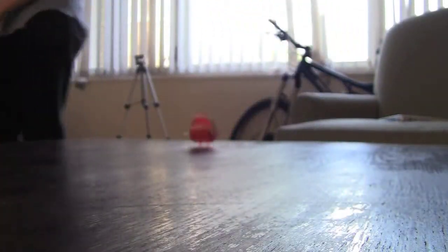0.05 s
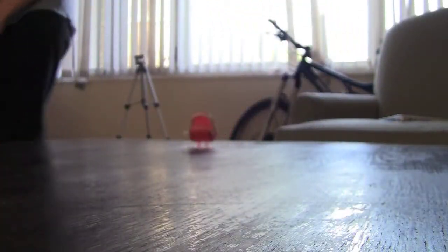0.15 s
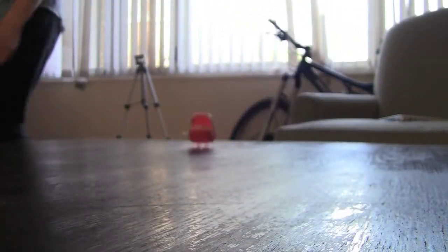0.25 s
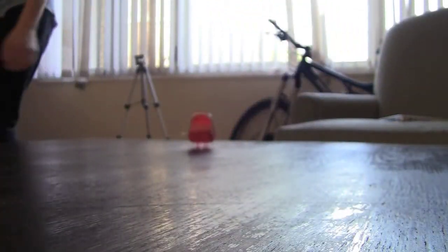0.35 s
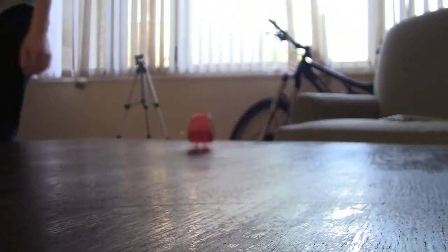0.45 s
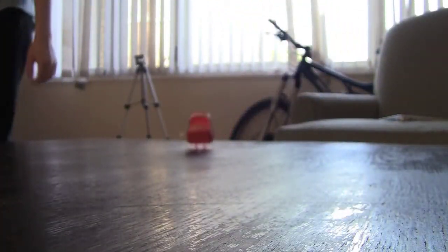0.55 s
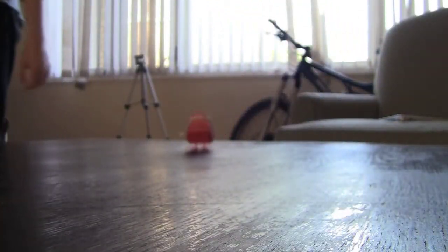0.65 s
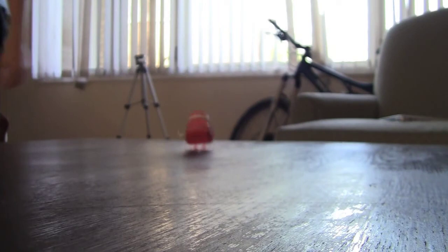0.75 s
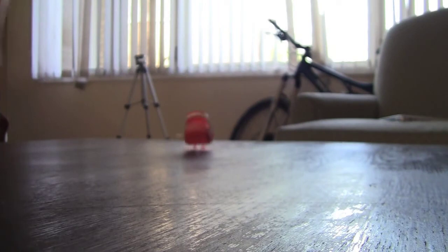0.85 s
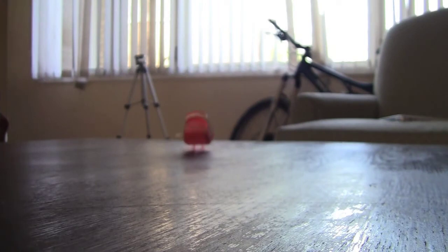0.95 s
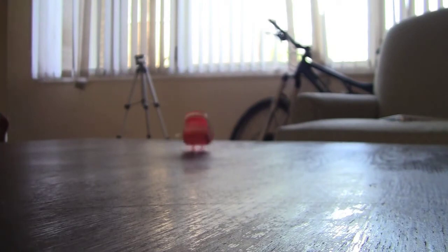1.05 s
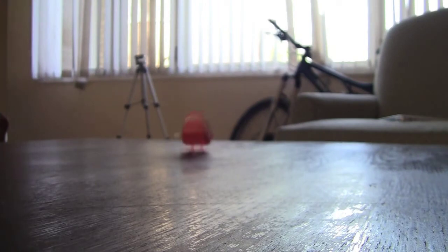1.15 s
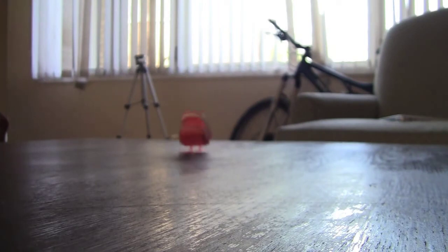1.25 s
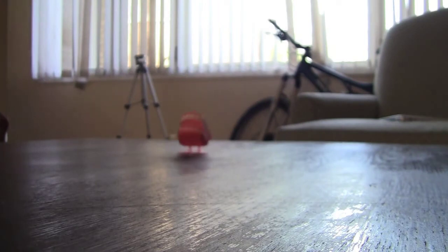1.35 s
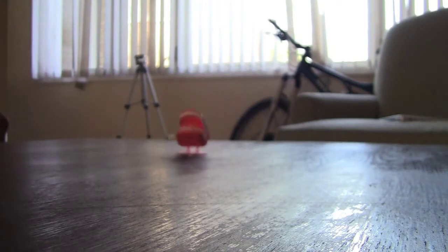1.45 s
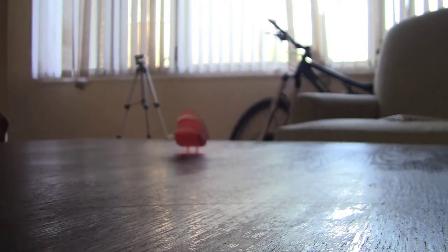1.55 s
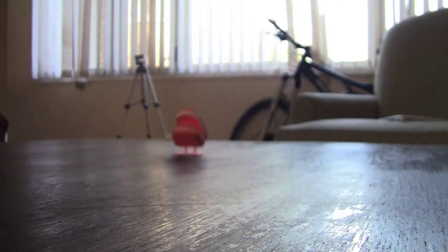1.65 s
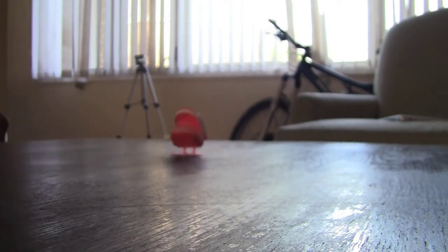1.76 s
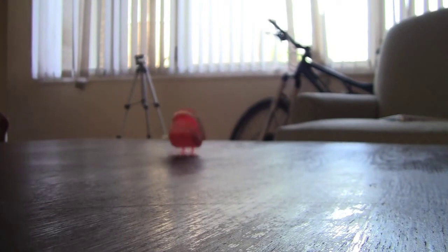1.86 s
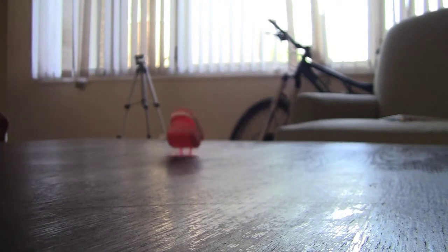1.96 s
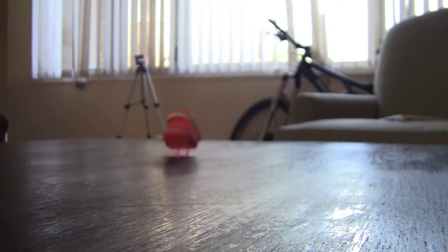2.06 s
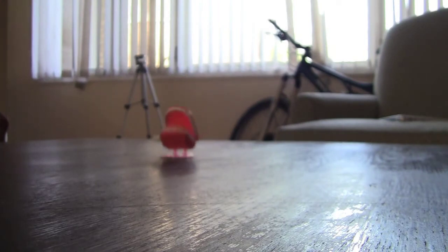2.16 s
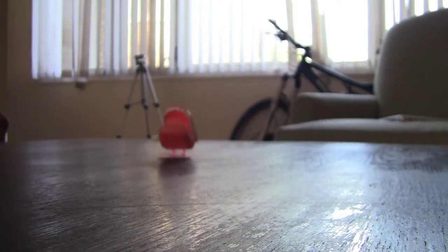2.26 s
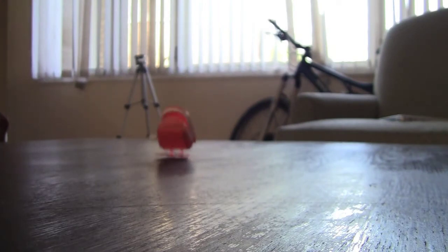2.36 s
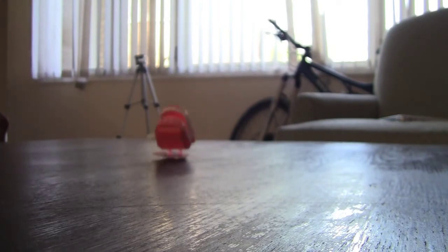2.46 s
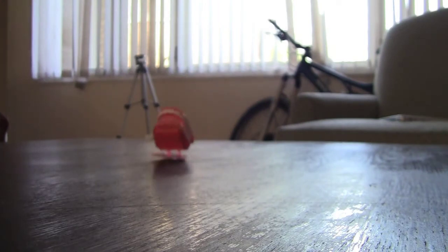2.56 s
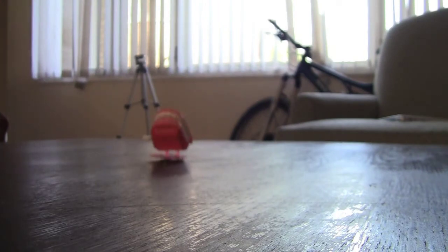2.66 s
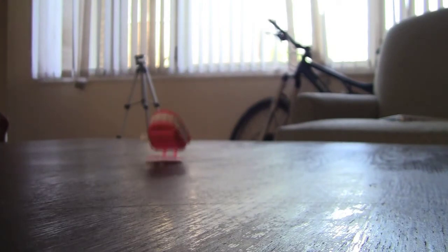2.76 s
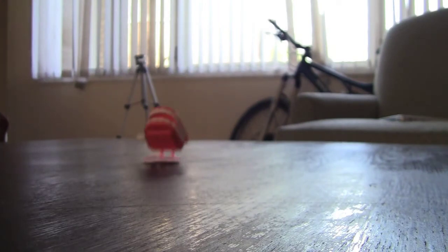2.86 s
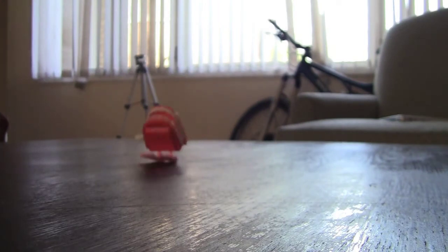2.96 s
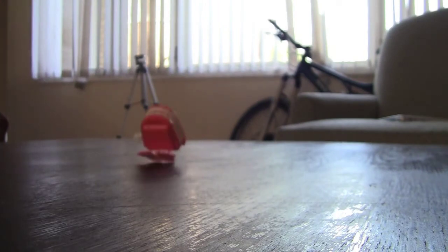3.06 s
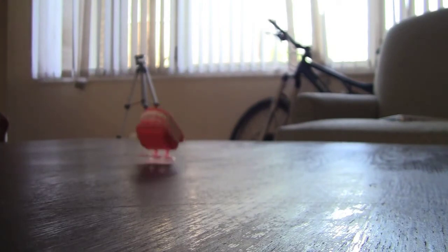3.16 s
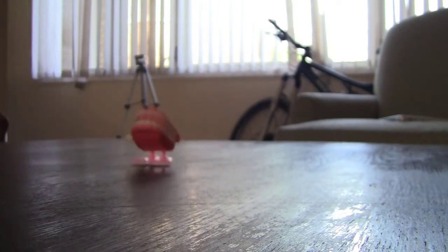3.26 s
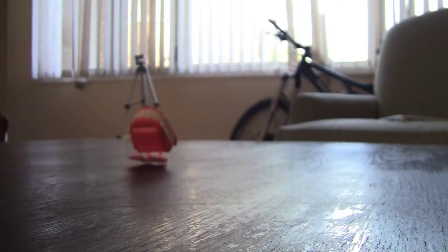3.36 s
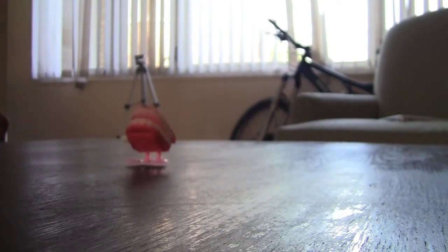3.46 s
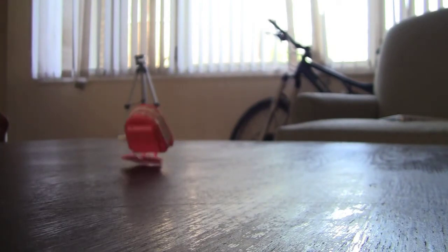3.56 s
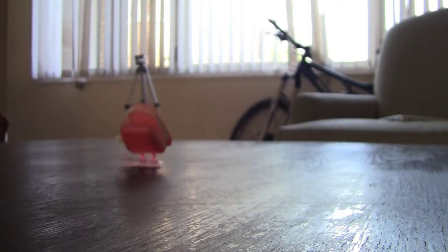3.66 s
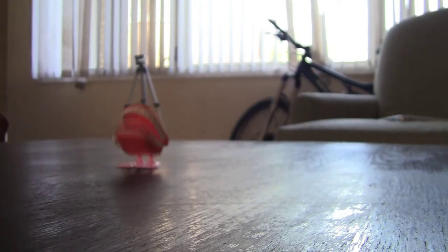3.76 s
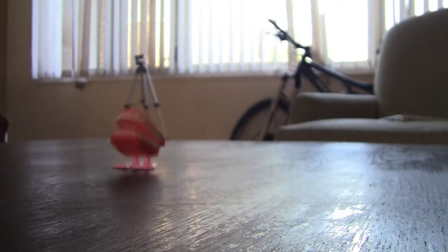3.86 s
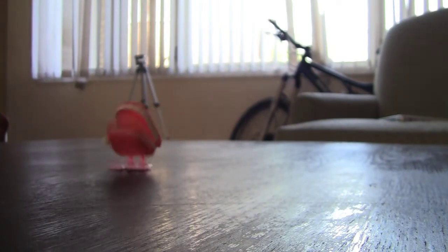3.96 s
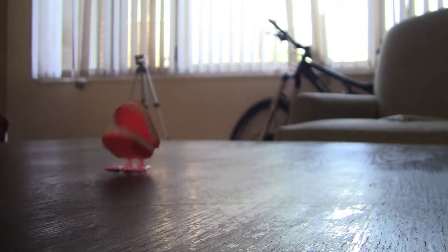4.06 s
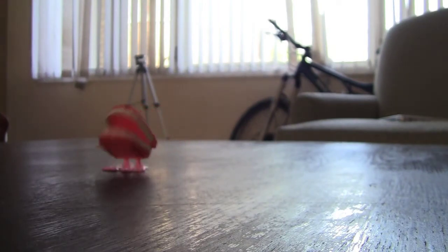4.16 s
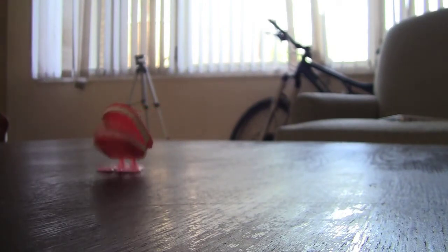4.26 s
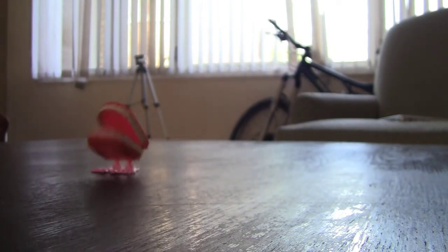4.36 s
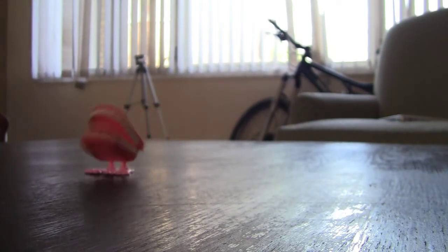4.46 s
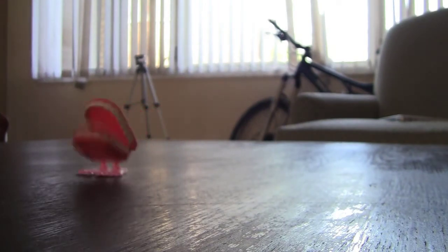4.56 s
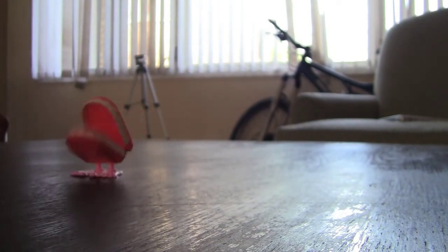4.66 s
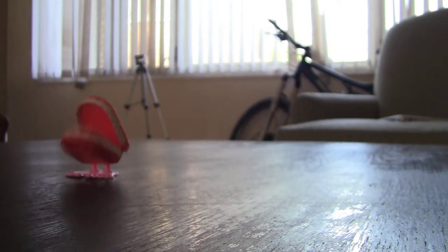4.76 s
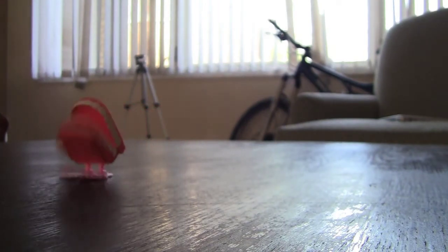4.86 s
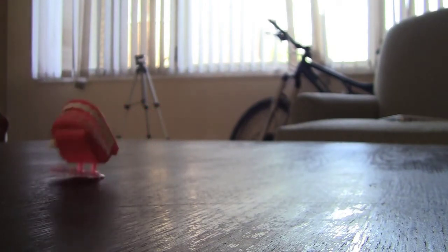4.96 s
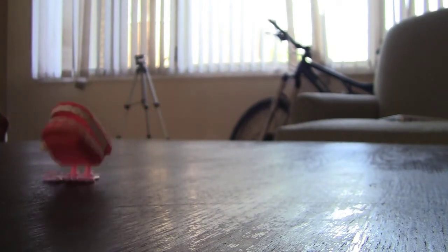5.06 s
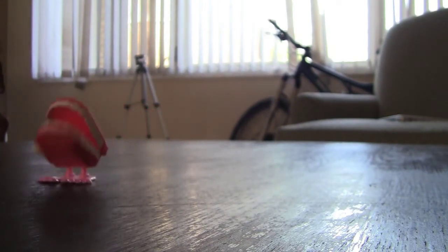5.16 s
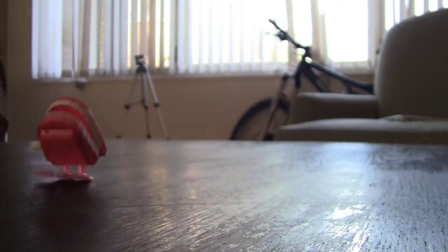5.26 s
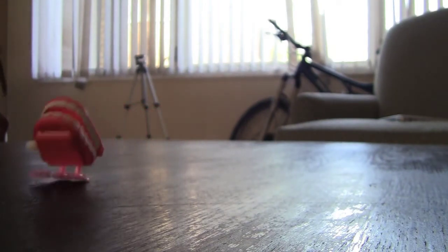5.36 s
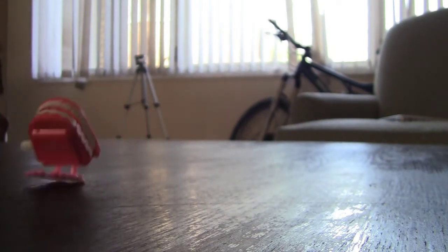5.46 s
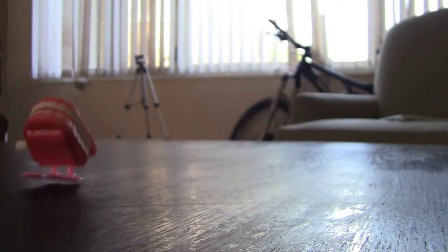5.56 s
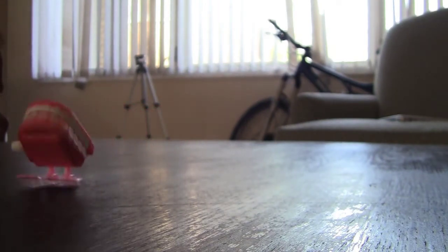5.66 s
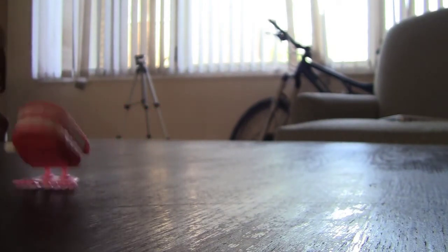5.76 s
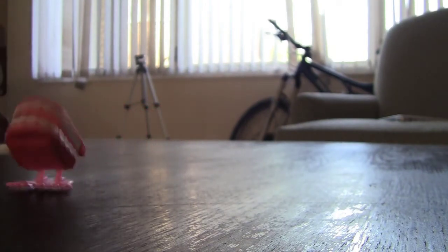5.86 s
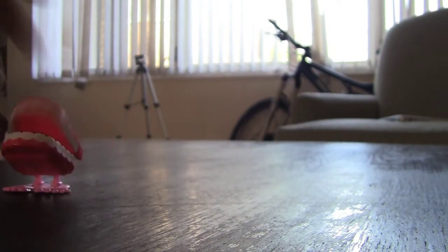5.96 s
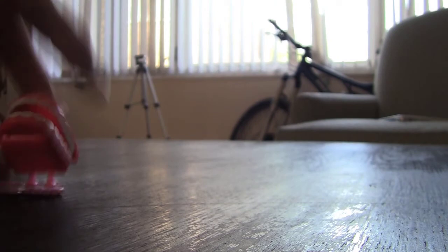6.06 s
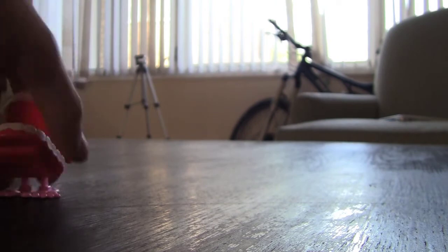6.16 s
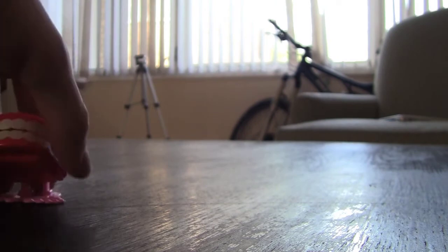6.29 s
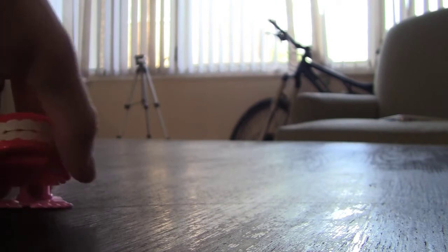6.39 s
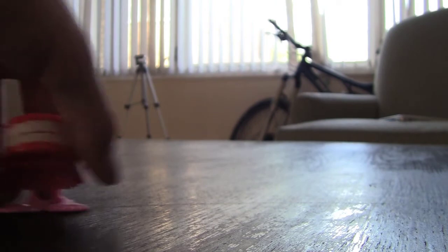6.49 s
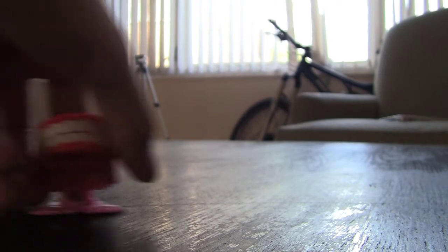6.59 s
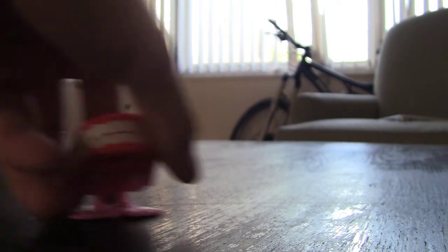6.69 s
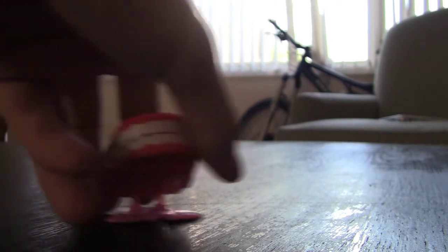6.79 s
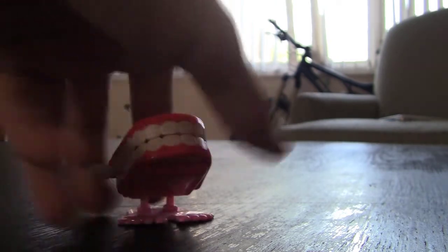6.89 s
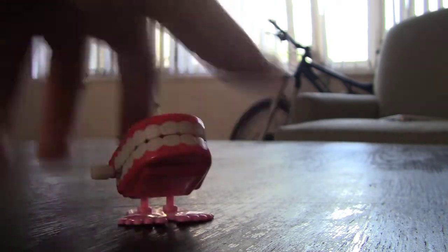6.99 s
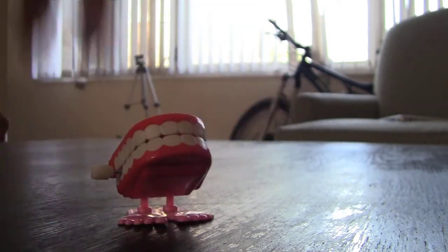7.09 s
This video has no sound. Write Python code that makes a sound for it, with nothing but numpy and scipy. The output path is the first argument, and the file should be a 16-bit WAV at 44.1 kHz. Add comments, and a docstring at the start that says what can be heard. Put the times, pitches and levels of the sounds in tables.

```python
"""Wind-up teeth on a wooden table

Place: a quiet furnished room with faint hum; the toy is nearly straight ahead of two close-set microphone ports.
About ten times a second the linkage knocks, the cam ticks and the jaws clack in either order, the feet land.
Gear teeth rattle in the case and drone in the wood until the spring runs down. A hand bumps the table, grabs
the toy, slides it, lets go. Blows and rubbing ring resonances; the air is coloured noise, spring and hum are
sine tones. The room adds reflections; the microphone dulls the treble, and a limiter ducks the loud clacks."""
import sys
import numpy as np
from scipy import signal
from scipy.fft import rfft, irfft
from scipy.io import wavfile

SR = 44100
rng = np.random.default_rng(int(sys.argv[2]) if len(sys.argv) > 2 else 0)


def pcm_store(signal):
    """Save signal as 16-bit PCM."""
    levels = np.round(np.clip(np.atleast_2d(signal), -1, 1) * 32767)
    wavfile.write(sys.argv[1], SR, levels.astype(np.int16).T)


N = 314433
TIME = np.arange(N) / SR
BINS = np.fft.rfftfreq(4096, 1 / SR)  # frequency grid of the resonant bodies [Hz]

# Levels in the tables are relative: each source trims its own. Resonances are nominal: blows may detune them.
# colour of the quiet room's air: (frequency [Hz], relative density [dB per Hz])
AIR = [(25, -19), (243, -4.5), (900, -18), (2400, -13), (10000, -27), (14000, -84)]
# running gears: (time [s], whirr in the air [dB], drone in the table [dB])
MOTOR = [(0, -34.5, -42), (.8, -40, -46.5), (1.6, -41.5, -48.5), (3.2, -43, -48), (6.0, -49, -56)]
# resonances of gear case and table top: (frequency [Hz], width [Hz], level [dB])
GEARS = [(2327, 53, 2), (2610, 710, -9.5), (3700, 73, -10), (4440, 860, -11.5), (6720, 670, -11),
         (9550, 140, -8)]
TABLE = [(102, 13, -11), (129, 7.8, -3.5), (166, 17, -2), (223, 14, -1), (328.3, 14, 2), (355, 34, -1.5),
         (404, 94, -1), (543, 33, -1), (774, 115, -1.5), (1041, 17.6, 4), (1130, 12.4, 0.5), (1374, 81, -5),
         (1630, 550, -9.5)]
# how gears and landing soles drive the table: (frequency [Hz], level [dB])
DRONE = [(100, -4.5), (400, -3), (1500, -7), (5000, -25)]
# one turn of the cam, one hop:
# (linkage knock [s], delay until jaws shut [s], knock [dB], clack [dB], spring ring [dB])
HOPS = [(0.0205, 0.018, -20, -13.5, -35), (0.101, 0.027, -28.5, -24.5, -44),
        (0.1965, 0.0432, -18, -14, -31), (0.301, 0.034, -26, -23.5, -35),
        (0.4148, 0.029, -16.5, -18, -34.0), (0.5205, 0.034, -20.0, -18.5, -31),
        (0.6278, 0.0217, -21, -20.5, -29), (0.7179, 0.0281, -22, -20.5, -28),
        (0.824, 0.016, -19, -15.5, -34), (0.928, 0.015, -23.5, -21.5, -48.0), (1.0305, 0.02, -25, -21, -41),
        (1.1241, 0.023, -23, -20, -35), (1.2201, 0.027, -21.5, -19, -35), (1.3245, 0.014, -19, -20, -53),
        (1.4235, 0.021, -22.5, -21.5, -39), (1.5206, 0.015, -22.5, -25.5, -51),
        (1.6179, 0.0246, -22.5, -20.5, -36), (1.7194, 0.018, -20.5, -17.0, -34),
        (1.8069, 0.027, -27, -22, -34), (1.9215, 0.0306, -19.5, -19.5, -47),
        (2.027, 0.028, -19.5, -21, -51), (2.1264, 0.0251, -21.0, -22.5, -29),
        (2.2211, 0.0212, -20.0, -16, -35), (2.31, 0.0425, -28, -19, -53), (2.433, 0.036, -21.5, -19, -40),
        (2.5425, 0.036, -20.0, -21, -32), (2.6483, 0.03, -21, -16, -53), (2.7445, 0.024, -27.5, -23.5, -48),
        (2.8477, 0.014, -24, -15.5, -32), (2.9508, 0.0082, -23, -22, -34),
        (3.0553, 0.03, -20.0, -18.0, -33), (3.1593, 0.039, -18.5, -17, -39), (3.2831, 0.026, -20, -17, -41),
        (3.3844, 0.0189, -22.0, -17, -50), (3.4728, 0.027, -26, -21.5, -50), (3.5793, 0.018, -22, -16, -41),
        (3.6688, 0.036, -26, -21.5, -37), (3.788, 0.034, -22, -16, -42), (3.8999, 0.029, -24.0, -21.5, -40),
        (4.0078, 0.018, -21.5, -14, -49.5), (4.0957, 0.036, -27, -23, -39), (4.217, 0.026, -21.0, -19, -41),
        (4.314, 0.023, -22.5, -18, -37), (4.4067, 0.029, -24.5, -23, -28), (4.5121, 0.029, -20, -19.5, -32),
        (4.6235, 0.019, -21, -16.0, -46), (4.7075, 0.037, -29.5, -22, -40),
        (4.8204, 0.029, -20, -18, -30.5), (4.9214, 0.039, -23, -15, -27), (5.039, 0.035, -19, -16, -42),
        (5.1552, 0.02, -23.0, -15.5, -44.0), (5.251, 0.019, -29, -17, -36),
        (5.3454, 0.029, -25.5, -24.5, -40), (5.4584, 0.031, -19.5, -18.5, -30.5),
        (5.5636, 0.038, -22.5, -17.5, -39), (5.6769, 0.033, -21, -20, -41),
        (5.7851, 0.026, -22.0, -18, -36), (5.8898, 0.014, -18.5, -13, -37), (5.986, 0.015, -24, -16.5, -31)]
# after each knock the cam slips and throws the toy up; it lands after a short flight
TAKEOFF_S, FLIGHT_S = 0.0192, 0.042
# resonances of linkage, cam, hollow jaws and teeth: (frequency [Hz], width [Hz], level [dB])
LINKAGE = [(2500, 590, -3), (2730, 260, -3), (3946, 143, 3), (5500, 820, -5), (6790, 170, 2),
           (6980, 180, -3), (8540, 770, -9.5), (9650, 420, -14.5), (9400, 530, -6.5), (10610, 490, 0)]
CAM = [(2320, 460, 2.7), (3800, 550, 3.1), (6600, 2900, 0.6), (8200, 590, 5.4), (9300, 3300, 2.7)]
JAWS = [(2360, 230, -3.5), (2620, 950, -6), (3000, 850, -6.5), (4400, 260, -6), (5150, 600, -10.5)]
TEETH = [(6637, 246, 0), (8280, 340, -3), (8850, 360, 1), (9560, 136, 5), (10220, 234, 2.5)]
# how a hard knock drives the table: (frequency [Hz], level [dB])
HARD = [(100, -6.5), (500, -15), (800, -4.5), (1700, -2), (3000, -9.5)]
# table top under the wandering toy: (time [s], how readily it sounds [dB], note favoured there [Hz])
SPOT = [(0, -4.5, 1560), (0.7, 1, 1200), (1.4, -2, 900), (2.3, -2, 795), (3.5, -10, 1030),
        (4.6, -7.5, 1070), (6.0, -7, 1080)]
# the steel spring, one row: (frequency [Hz], level [dB], 60 dB decay [s])
SPRING = (2353, 4.1, 0.18)
# how toes and foot edges drive the table: (frequency [Hz], level [dB])
SCUFF = [(400, -4), (1000, -0.5), (1400, 11.5), (2200, -13)]
# a foot comes down on its edge: (time [s], plastic [dB], table [dB])
STUMBLES = [(0.164, -19, -36), (0.17, -22.5, -37), (0.1888, -17.5, -26), (0.194, -18.5, -17),
            (1.398, -25, -34), (2.191, -28, -37), (3.022, -22.5, -30)]
# the toy clicks in the hand and is set down: (time [s], body [dB], sharp edge [dB])
HANDLING = [(6.1462, -37, -15), (6.157, -25, -18), (6.176, -34, -21), (6.214, -35, -16),
            (6.237, -22.5, -49), (6.294, -30, -33), (6.3812, -17, -11.5), (6.397, -29, -48),
            (6.678, -38.5, -63), (6.713, -41, -68), (7.007, -19, -17), (7.012, -18, -27)]
# resonances of the held toy's soles and legs: (frequency [Hz], width [Hz], level [dB])
SOLES = [(2350, 490, 4.5), (2780, 290, 4), (4240, 860, -3), (6860, 2000, -13), (9350, 2100, -10)]
# how a blunt and a sharp contact drive the soles: (frequency [Hz], level [dB])
BLUNT = [(600, -1), (1500, 1), (3000, 3), (4000, 0), (8000, -6.5)]
SHARP = [(3000, -13), (6000, -0.5), (10500, 3), (12500, -15)]
# the hand bumps the table: (time [s], level [dB], decay [s])
BUMPS = [(6.214, -22.5, 0.031), (6.236, -33, 0.022), (6.274, -37, 0.031)]
# toy and hand slide over the wood: (time [s], rumble [dB], hiss [dB])
SLIDE = [(6.3, -36, -52), (6.42, -46.5, -51), (6.6, -37.5, -56), (6.75, -41, -53), (6.85, -39.5, -48.5),
         (6.95, -45, -54), (7.13, -41, -74)]
# how a soft hand drives the table: (frequency [Hz], level [dB])
SOFT = [(100, 8.5), (400, 2), (700, -2.5), (1100, -6.5), (1800, -13.5), (6000, -33)]
# decay of the room's tail: (frequency [Hz], 60 dB decay [s])
ROOM = [(200, 0.63), (2500, 0.2), (6000, 0.19), (12000, 0.052)]
# a faint, short noise-like spread between left and right, strongest above 11 kHz: (frequency [Hz], level [dB])
SPREAD = [(300, -15.5), (2500, -33), (6000, -16.5), (7500, -11), (10000, -30), (11000, -5), (12300, 0),
          (16000, -8)]
MIC_HZ = 11850  # where the microphone starts to dull the treble
EDGE_HZ = 16300  # steep cut at the very top


def amp(db):
    """Decibels to gain."""
    return 10 ** (np.asarray(db) / 20)


def unit(x):
    """Scales a signal to rms 1."""
    return x / np.sqrt(np.mean(x ** 2) + 1e-20)


def read(points, hz):
    """Reads a spectrum table on a log-frequency axis."""
    f, value = np.transpose(points)
    return np.interp(np.log(hz + 1), np.log(f + 1), value)


def add(mix, s, sound):
    """Mixes a sound in at time s."""
    part = mix[max(round(s * SR), 0):][:len(sound)]
    part += sound[:len(part)]


def flutter(per_s):
    """Random wander of rms 1, its spectrum fading out around per_s [Hz]."""
    fade = np.exp(-(np.fft.rfftfreq(N, 1 / SR) / per_s) ** 2)
    return unit(irfft(rfft(rng.standard_normal(N)) * fade, N))


def body(modes, drive=((1, 0),), vary_db=0, detune=0):
    """Causal impulse response of a set of resonances; each blow can meet them a little differently."""
    hz, width, db = np.transpose(modes)[:, :, None]
    loud, shift = rng.standard_normal((2, len(modes), 1))
    hz = hz * (1 + detune * shift)
    off_tune = (BINS ** 2 - hz ** 2) / ((BINS + 1) * width)
    power = amp(db + vary_db * loud) ** 2 / (1 + off_tune ** 2)
    magnitude = np.sqrt(power.sum(0)) * amp(read(drive, BINS))
    # folding the cepstrum gives minimum phase: the energy comes as early as it can
    cepstrum = irfft(np.log(magnitude + 1e-5))
    cepstrum[1:len(BINS) - 1] *= 2
    cepstrum[len(BINS):] = 0
    return irfft(np.exp(rfft(cepstrum)))


def strike(ring, db, chatter_s, rattle):
    """One blow with a dying rattle of the contact; db is the rms level over its first 6 ms."""
    t = np.arange(len(ring)) / SR
    force = rattle * rng.standard_normal(len(t)) * np.exp(-t / chatter_s) / np.sqrt(chatter_s * SR / 2)
    force[0] += 1
    sound = signal.fftconvolve(force, ring)[:len(t)]
    onset_rms = np.sqrt(np.mean(sound[:round(.006 * SR)] ** 2))
    return amp(db) * sound / onset_rms


def rub(ring, grain_db=0, per_s=SR):
    """Endless small impacts of uneven size, about per_s a second, ring a body; rms 1."""
    size = amp(grain_db * np.minimum(rng.exponential(1, N), 4)) * rng.standard_normal(N)
    impacts = size * (rng.random(N) < per_s / SR)
    return unit(signal.oaconvolve(impacts, ring)[:N])


def swells(rows, rise_s):
    """Envelope of pushes (time [s], level [dB], decay [s]) that rise quickly and die away."""
    level, t = np.zeros(N), np.arange(SR // 2) / SR
    for s, db, decay_s in rows:
        add(level, s, amp(db) * (1 - np.exp(-t / rise_s)) * np.exp(-t / decay_s))
    return level


def table_at(s, drive, note_db=2, note_width_hz=170):
    """The ring of the table top where the toy stands at time s, and how readily it sounds there [dB]."""
    times, give_db, note_hz = np.transpose(SPOT)
    note = (np.interp(s, times, note_hz), note_width_hz, note_db)
    wood = body([*TABLE, note], drive, vary_db=3.0, detune=0.043)
    return wood, np.interp(s, times, give_db)


def background(air_db=-52, hum_db=-58, hum_hz=120, apart=0.23):
    """Still air as coloured noise, mostly shared by the two ports, and a faint mains hum as a sine."""
    colour = amp(read(AIR, np.fft.rfftfreq(N, 1 / SR)))
    shared, left, right = (unit(irfft(rfft(z) * colour, N)) for z in rng.standard_normal((3, N)))
    hum = amp(hum_db) * unit(np.sin(2 * np.pi * hum_hz * TIME))
    return amp(air_db) * (shared + apart * np.array([left, right])) + hum


def motor(whirr_db=2, drone_db=4, airborne_db=-8, unloaded_db=1.5, stop_s=6.13):
    """Gear teeth rattle in the case, a little louder in flight, when the table drone drops."""
    s, air_db, wood_db = np.transpose(MOTOR)
    running = np.clip((stop_s - TIME) / 0.14, 0, 1)
    aloft = np.zeros(N)
    for knock_s, *_ in HOPS:
        add(aloft, knock_s + TAKEOFF_S, signal.windows.tukey(round(FLIGHT_S * SR), .3))
    whirr_level = amp(np.interp(TIME, s, air_db) + whirr_db + unloaded_db * aloft)
    drone_level = amp(np.interp(TIME, s, wood_db) + drone_db + airborne_db * aloft)
    whirr = whirr_level * rub(body(GEARS), grain_db=1, per_s=1100)
    drone = drone_level * rub(body(TABLE, DRONE))
    return running * (whirr + drone) * amp(3.27 * flutter(per_s=15.6))


def linkage(plastic_db=2.5, table_db=-5, cam_db=-2):
    """The lever knocks, and the legs carry the knock into the table; then the cam ticks as it slips."""
    out = np.zeros(N)
    for s, _, db, _, _ in HOPS:
        wood, give_db = table_at(s, HARD)
        lever = body(LINKAGE, vary_db=0.0, detune=0.011)
        cam = body(CAM, vary_db=2, detune=0.0058)
        add(out, s, strike(lever, db + plastic_db, chatter_s=0.0018, rattle=0.83))
        add(out, s, strike(wood, db + give_db + table_db, chatter_s=0.0091, rattle=1.0))
        add(out, s + TAKEOFF_S, strike(cam, db + cam_db, chatter_s=0.0035, rattle=2.6))
    return out


def jaws(shell_db=2.5, teeth_db=-13.5, teeth_follow=0.48, glancing_db_per_s=55):
    """Hollow jaws give the clack its body, teeth its sharp edge; jaws that shut late meet less squarely."""
    out = np.zeros(N)
    _, usual_delay, _, usual_db, _ = np.mean(HOPS, axis=0)
    shell_drive = [(400, -8), (1500, 0), (5500, 0), (9000, -10)]  # (frequency [Hz], level [dB])
    teeth_drive = [(2000, 5.0), (6000, 1.6)]
    for s, delay, _, db, _ in HOPS:
        shell = body(JAWS, shell_drive, vary_db=1.3, detune=.015)
        teeth = body(TEETH, teeth_drive, vary_db=1, detune=0.012)
        edge_db = teeth_db + teeth_follow * (db - usual_db) - glancing_db_per_s * (delay - usual_delay)
        add(out, s + delay, strike(shell, db + shell_db, chatter_s=0.0013, rattle=1.0))
        add(out, s + delay, strike(teeth, edge_db, chatter_s=0.0019, rattle=1.0))
    return out


def spring(ring_db=3, buzz_db=3.5, detune=0.0035, jolt_db=-38, jolt_fade_db_per_s=4):
    """Clacks set the steel spring singing and buzzing on its coils; landings jolt it, less as it unwinds."""
    out, t = np.zeros(N), np.arange(SR // 4) / SR
    plucks = [(s + delay, db + ring_db) for s, delay, _, _, db in HOPS]
    plucks += [(s + TAKEOFF_S + FLIGHT_S, jolt_db - jolt_fade_db_per_s * s) for s, *_ in HOPS]
    hz, mode_db, t60 = SPRING
    for (s, db), (phase, shift) in zip(plucks, rng.standard_normal((len(plucks), 2))):
        tone = np.sin(2 * np.pi * (hz * (1 + detune * shift) * t + phase))
        add(out, s, amp(db + mode_db) * np.exp(-np.log(1000) * t / t60) * tone)
    return out * amp(buzz_db * flutter(per_s=59))


def feet(toe_db=-32, sole_db=-37, settle_s=0.014, scrape_db=-35, scuff_s=0.016,
         scatter_s=0.0027, uneven_db=0.5):
    """After each flight the toes tap the wood, the soles settle with a lower thud, and they skid briefly."""
    out, skids = np.zeros(N), []
    for (knock_s, *_), (late, hard) in zip(HOPS, rng.standard_normal((len(HOPS), 2))):
        s = knock_s + TAKEOFF_S + FLIGHT_S + scatter_s * late
        wood, give_db = table_at(s, SCUFF)
        db = give_db + uneven_db * hard
        thud = body(TABLE, DRONE, vary_db=1, detune=0.036)
        add(out, s, strike(wood, db + toe_db, chatter_s=0.0031, rattle=1.47))
        add(out, s + settle_s, strike(thud, db + sole_db, chatter_s=0.0068, rattle=2.5))
        skids.append((s, db + scrape_db, scuff_s))
    return out + swells(skids, rise_s=0.001) * rub(body(LINKAGE), grain_db=6, per_s=1500)


def stumbles():
    """Now and then the edge of a foot clatters, ringing both the toy's plastic and the wood."""
    out = np.zeros(N)
    for s, plastic_db, wood_db in STUMBLES:
        wood, _ = table_at(s, SCUFF)
        plastic = body(LINKAGE, vary_db=6.5, detune=0.027)
        add(out, s, strike(plastic, plastic_db, chatter_s=0.0048, rattle=2.5))
        add(out, s, strike(wood, wood_db, chatter_s=0.007, rattle=1.7))
    return out


def handling(low_db=2, high_db=-2):
    """Fingers damp the jaws, so the stiff soles give the click, by a blunt and a sharp contact."""
    out = np.zeros(N)
    for s, body_db, edge_db in HANDLING:
        blunt = body(SOLES, BLUNT, vary_db=2)
        add(out, s, strike(blunt, body_db + low_db, chatter_s=0.0043, rattle=2.4))
        add(out, s, strike(body(SOLES, SHARP), edge_db + high_db, chatter_s=0.0026, rattle=2.0))
    return out


def hand(rumble_db=-1, hiss_db=0, scrape_db=-7, start_s=6.29):
    """Bumps on the table with fingers scraping the plastic, then rumble and hiss of sliding over the grain."""
    s, low_db, high_db = np.transpose(SLIDE)
    sliding = np.clip((TIME - start_s) / 0.034, 0, 1) * amp(2 * flutter(per_s=26))
    bumps = swells(BUMPS, rise_s=0.001)
    push = bumps + sliding * amp(np.interp(TIME, s, low_db) + rumble_db)
    grip = amp(scrape_db) * bumps + sliding * amp(np.interp(TIME, s, high_db) + hiss_db)
    wood = push * rub(body(TABLE, SOFT))
    finger_drive = [(1200, 7.0), (2500, -10.5), (13000, -3.5)]  # (frequency [Hz], level [dB])
    plastic = grip * rub(body(SOLES, finger_drive), grain_db=2, per_s=2400)
    return wood + plastic


def room(x, wet_db=-17, near_db=-19, near_s=0.0039, apart=0.37):
    """Quick reflections off table and camera, and the short tail of a furnished room."""
    t = np.arange(SR // 2) / SR
    taps = rng.standard_normal((3, len(t))) * (rng.random((3, len(t))) < .15)
    hz, at, z = signal.stft(taps * np.clip(t / 0.0022, 0, 1), SR, nperseg=256)
    decay = np.exp(-np.log(1000) * at / read(ROOM, hz)[:, None])
    tail = signal.istft(z * decay, SR, nperseg=256)[1][:, :len(t)]
    tail = tail[0] + apart * tail[1:]  # two close ports hear much the same
    near = rng.standard_normal((3, len(t))) * np.exp(-t / near_s)
    near = near[0] + apart * near[1:]
    echo = amp(wet_db) * tail / np.linalg.norm(tail[0]) + amp(near_db) * near / np.linalg.norm(near[0])
    return x + signal.oaconvolve(x[None], echo, axes=1)[:, :N]


def ports(x, lead_s=3e-6, spread_s=0.0027):
    """Sound reaches the left port a little sooner; a faint, short noise-like spread parts left and right."""
    hz, t = np.fft.rfftfreq(N, 1 / SR), np.arange(SR // 40) / SR
    spread = rng.standard_normal(len(t)) * np.exp(-t / spread_s)
    lead = np.pi * 1j * hz * lead_s  # half the lead for each port, with opposite signs
    side = lead + amp(read(SPREAD, hz)) * rfft(spread / np.linalg.norm(spread), N)
    return irfft(rfft(x) * (1 + side * np.array([[1], [-1]])), N)


def scene():
    """The toy and the hand in the room, nearly straight ahead."""
    toy = motor() + linkage() + jaws() + spring() + feet() + stumbles()
    heard = ports(room(toy + handling() + hand()))
    balance = amp([[-.15], [.15]])  # left, right
    return heard * balance + background()


def record(dry, limit_db=-19, squeeze=0.7, recover_db_per_s=330, ceiling=1.0):
    """The microphone dulls the top; a limiter ducks just after a loud onset, and peaks past the ceiling clip."""
    x = signal.sosfilt(signal.butter(N=6, Wn=min(MIC_HZ, .45 * SR), fs=SR, output="sos"), dry)
    power = signal.lfilter([1 / 64], [1, 1 / 64 - 1], (x ** 2).mean(0))
    # the held level jumps up with the power and falls back at a steady rate
    fall = TIME * recover_db_per_s
    held_db = np.maximum.accumulate(10 * np.log10(power + 1e-12) + fall) - fall
    over_db = np.maximum(held_db - limit_db, 0)
    over_db = signal.lfilter([1 / 90], [1, 1 / 90 - 1], over_db)  # the gain lags, so onsets get through
    clipped = np.clip(x / amp(squeeze * over_db), -ceiling, ceiling)
    top_cut = signal.firwin(255, EDGE_HZ, window=("kaiser", 8), fs=SR)
    return signal.oaconvolve(clipped, top_cut[None], "same")


dry = scene()
out = record(dry)
pcm_store(out)
```